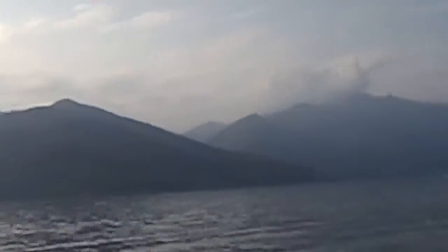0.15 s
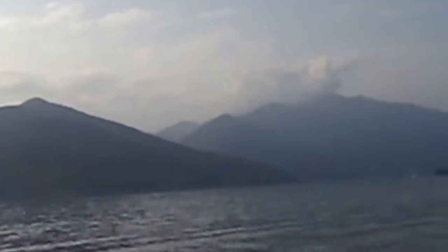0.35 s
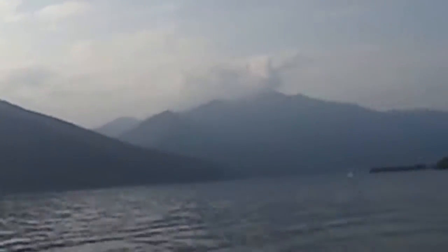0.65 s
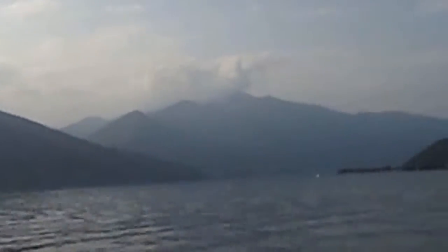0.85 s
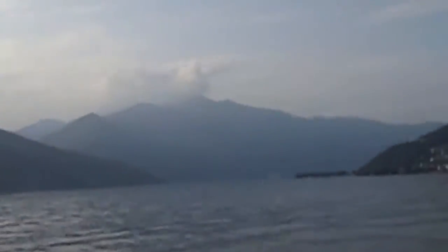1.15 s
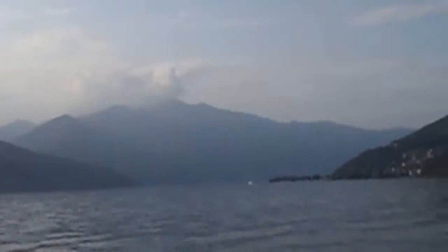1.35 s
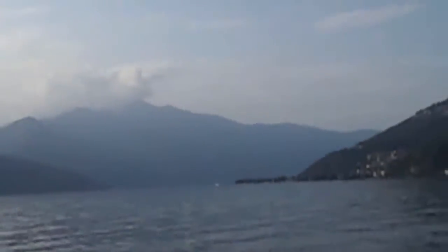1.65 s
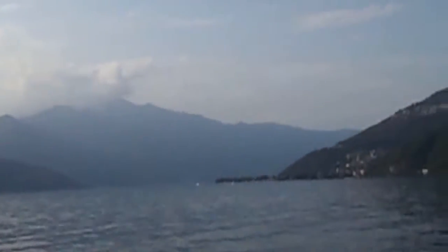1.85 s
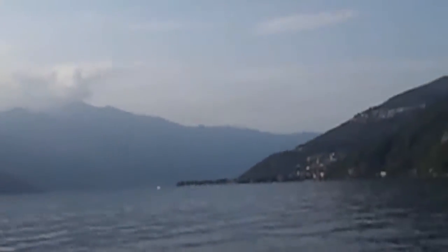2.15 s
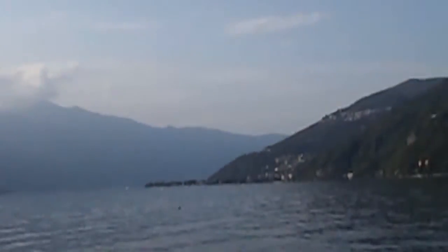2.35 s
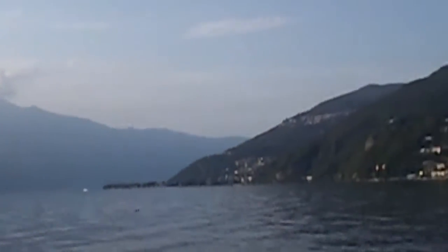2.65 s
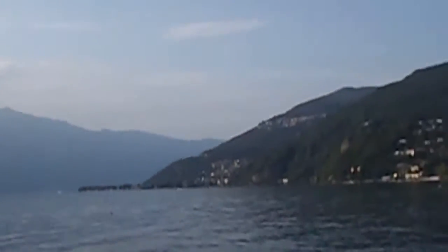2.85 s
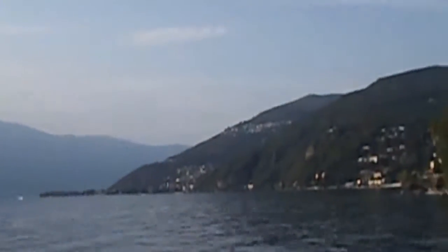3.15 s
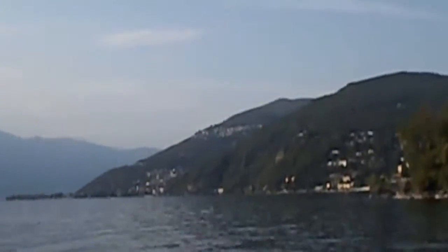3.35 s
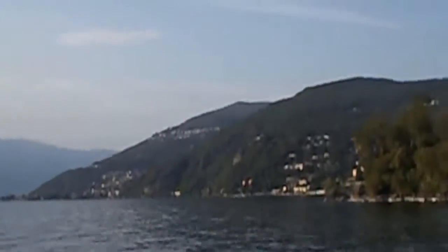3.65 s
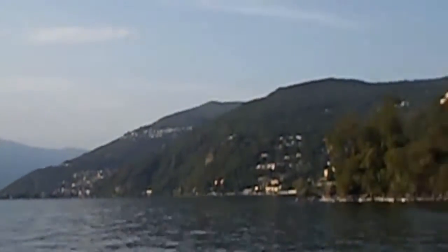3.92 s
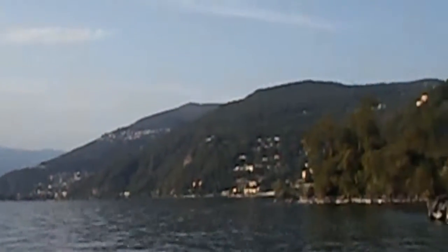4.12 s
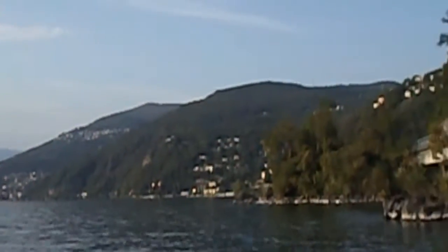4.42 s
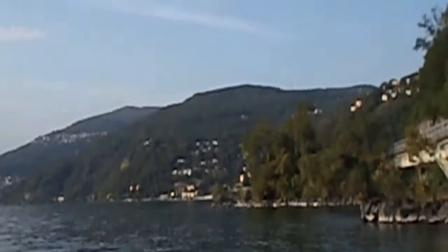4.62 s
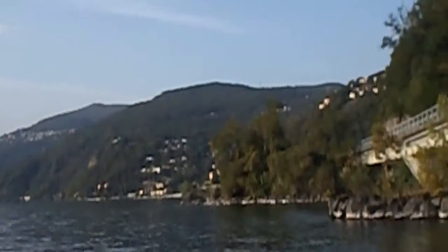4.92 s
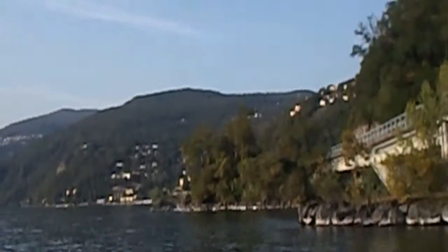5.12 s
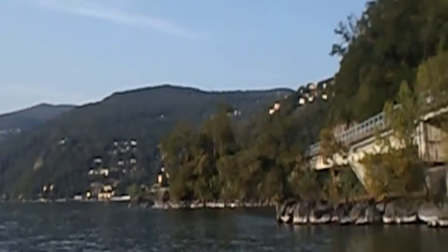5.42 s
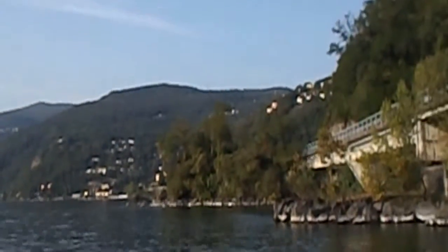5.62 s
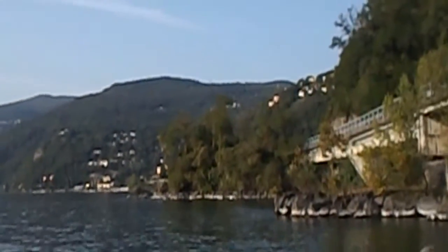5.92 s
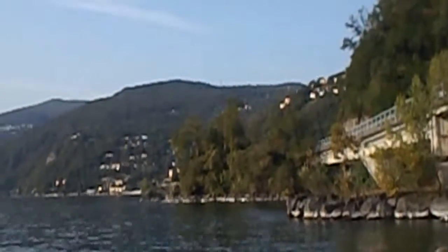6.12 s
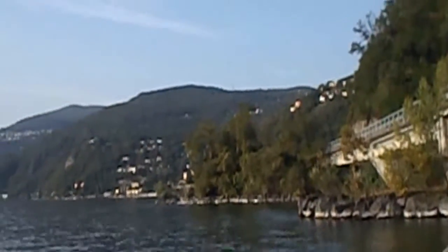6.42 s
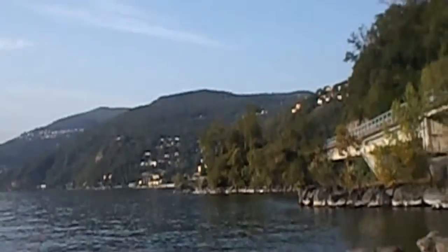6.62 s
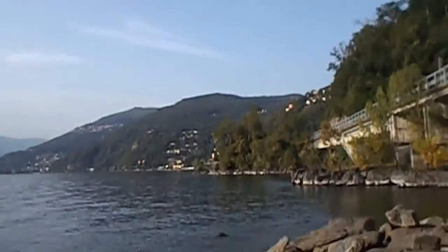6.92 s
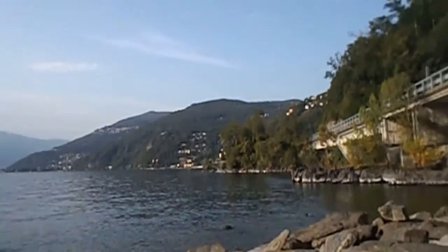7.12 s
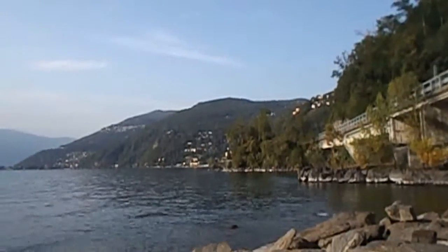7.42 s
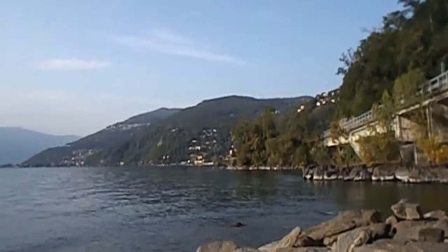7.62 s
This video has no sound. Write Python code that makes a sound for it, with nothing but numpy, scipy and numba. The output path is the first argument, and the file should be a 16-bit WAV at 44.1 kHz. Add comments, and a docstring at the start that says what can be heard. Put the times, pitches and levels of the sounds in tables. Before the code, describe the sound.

Irregular wavelets slap stones and drain through pebbles with gurgles, glugs and fine dry trickling. Early on, a soft low breeze dies away while a far whoosh and brief low drone swell behind. Hard little ticks dot the water, busiest around five seconds. Later, camera plastic creaks raspingly and clicks sharply. Close, open-air sound through a narrow-band, muffled microphone.

```python
"""Small waves lap on a stony lake shore: trapped air gurgles, water splashes and spray fizzes.
The water is swarms of ringing bubbles over filtered noise; single bubbles, strings of them and ticks stand out.
Far traffic hums, a distant whoosh of moving noise bands rises and fades, and a low drone swells twice.
A soft breeze dies away and a hollow among the rocks sounds faintly. Near the end a hand-held camera's
casing creaks and snaps, once with a loud click: short pushes make its plastic shell ring."""
import sys
import numpy as np
from scipy import signal
from scipy.fft import rfft, irfft, next_fast_len
from scipy.io import wavfile
from scipy.ndimage import map_coordinates
from numba import njit

SR = 44100
rng = np.random.default_rng(int(sys.argv[2]) if len(sys.argv) > 2 else 0)


def file_out(sig):
    """Save sig as 16-bit WAV at sys.argv[1]."""
    # one column per channel
    cols = np.atleast_2d(sig).T
    # limit, then scale
    lim = np.clip(cols, -1, 1)
    pcm = np.round(lim * 32767).astype(np.int16)
    wavfile.write(sys.argv[1], SR, pcm)


N = 342650
TIME = np.arange(N) / SR


def undb(db):
    """Turn decibels into a gain."""
    return 10 ** (np.asarray(db) / 20)


def unit(x):
    """Scale a sound to an average (rms) strength of 1."""
    return x / np.sqrt(np.mean(x ** 2))


def noise():
    """Plain white noise for the whole scene."""
    return rng.standard_normal(N)


def colour(x, points):
    """Filter a sound by a curve of (Hz, dB) points, joined by lines over log frequency."""
    hz, db = np.transpose(points)
    size = next_fast_len(N + 8192)
    bins = np.maximum(np.arange(size // 2 + 1) * SR / size, 1)
    gain = undb(np.interp(np.log(bins), np.log(hz), db))
    return irfft(rfft(x, size) * gain, size)[:N]


def cut(x, hz, kind, order):
    """Remove what lies above ("low") or below ("high") a frequency."""
    return signal.sosfilt(signal.cheby1(order, 1, hz, kind, fs=SR, output="sos"), x)


def walk(rate):
    """A smooth random curve of rms 1 that changes about rate times a second."""
    steps = rng.standard_normal(16384)
    return unit(map_coordinates(steps, [TIME * rate], order=2, mode="wrap"))


def swell(peak_s, rise_s, fall_s):
    """A bell-shaped curve, 1 at its peak, with its own rise and fall."""
    return np.exp(-((TIME - peak_s) / np.where(TIME < peak_s, rise_s, fall_s)) ** 2)


def narrow_noise(hz, width_hz):
    """Noise in a narrow band around a centre that may move."""
    phase = 2 * np.pi * np.cumsum(hz * np.ones(N)) / SR
    return unit(walk(width_hz) * np.cos(phase) + walk(width_hz) * np.sin(phase))


def impulses(times, sizes):
    """Single one-sample pushes at given times."""
    places = np.round(np.asarray(times) * SR).astype(int)
    return np.bincount(np.clip(places, 0, N - 1), sizes, N)


@njit
def rings(times, hz, size, cycles, glide):
    """Sines that die by 60 dB within their cycles while the pitch rises by the share glide."""
    out = np.zeros(N)
    for k in range(len(times)):
        start = int(times[k] * SR)
        length = int(cycles[k] * SR / hz[k]) + 2
        phase = 0.
        for i in range(max(0, -start), min(length, N - start)):
            age = i / length
            phase += 2 * np.pi * hz[k] * (1 + glide * age) / SR
            onset = 1 - np.exp(-phase / 2)
            out[start + i] += size[k] * np.exp(-6.9 * age) * onset * np.sin(phase)
    return out


def scatter(x, t60, wet_db):
    """Add a short diffuse tail, as from nearby uneven surfaces; it dies by 60 dB in t60 seconds."""
    t = np.arange(SR // 4) / SR
    tail = rng.standard_normal(len(t)) * undb(-60 * t / t60) * (t > .001)
    return x + undb(wet_db) * signal.fftconvolve(x, tail / np.linalg.norm(tail))[:N]


# Small waves running up the stones. Each row: crest in seconds, rise and drain times in seconds,
# power the wave adds at its crest to wash and to gurgle, in dB against calm water.
WAVES = [(0.102, 0.12, 0.31, 11, 11), (.41, 0.096, 0.13, 12, -4), (.72, 0.3, 0.27, 4.5, 7.5),
         (1.03, 0.19, 0.84, 5.5, -6), (2.248, 0.56, 0.79, 1.5, 4.5), (2.94, 0.58, 1, 6, -9),
         (3.48, 0.17, 0.49, 8, -1), (3.95, 0.056, 0.32, 5.5, -22), (4.482, 0.21, 0.99, 4, 0.5),
         (4.95, 0.19, 1, 6.5, -2.5), (5.33, 0.095, 0.26, 10, 3), (5.58, 0.04, 0.37, 5.5, 2.5),
         (5.75, 0.18, 0.26, 12.5, -15), (7.2, 0.1, 0.15, -8, -3), (7.45, 0.095, 0.13, 9, 2.5),
         (7.76, 0.21, .3, 11.5, -18)]


def surge(strengths_db, drain_stretch):
    """Level over calm water in dB: each wave builds to its crest and drains away, and their powers add."""
    power = 1
    for (crest, rise, drain, *_), db in zip(WAVES, strengths_db):
        age = TIME - crest
        fade = np.where(age < 0, (age / rise) ** 2, age / (drain * drain_stretch))
        power = power + (undb(db) * np.exp(-fade)) ** 2
    return 10 * np.log10(power)


# Wavelets that slap the rocks and throw up bubbles.
# Each row: peak in seconds, half length in seconds, rise in dB (each part of the water scales this).
SLAPS = [(0.242, 0.067, 2.5), (3.628, 0.0074, 1), (4.497, 0.0097, 3.5), (5.287, 0.022, 4),
         (5.325, 0.0051, 2.5), (5.47, 0.027, 1.5), (5.603, 0.012, 3.5), (5.844, 0.0067, 2),
         (5.91, 0.0031, 5.5), (6.136, 0.013, 5.5), (7.18, 0.013, 3)]


def slaps():
    """Brief rises in dB as wavelets hit the rocks."""
    return sum(db * swell(s, half, half) for s, half, db in SLAPS)


def froth(spectrum, low_hz, high_hz, cycles, spread_db, rush_db, flutter_db, count):
    """A swarm of bubbles of all sizes over the smooth rush of the water, in uneven spurts."""
    when, pitch, strength, life = rng.random((count, 4)).T
    hz = low_hz * (high_hz / low_hz) ** pitch
    size = undb(-spread_db * np.log(1 - .965 * strength))
    swarm = rings(when * N / SR, hz, size * hz / low_hz, cycles * (.5 + life), .13)
    rush = unit(colour(noise(), spectrum))
    water = unit(colour(swarm, spectrum)) + undb(rush_db) * rush
    return unit(water * undb(flutter_db * walk(28)))


# Colour of the gurgle. Each row: frequency in Hz, level in dB.
GURGLE = [(90, -46), (170, 8), (250, 0), (340, 1), (450, -2.5), (650, 1), (850, 2), (1150, -4),
          (1800, -2.5), (3500, -37)]
GURGLE_DB = -54  # in calm water


def gurgle(air_db, slap_db):
    """Big, low bubbles of air trapped between the rocks."""
    water = froth(GURGLE, 220, 1200, cycles=23, spread_db=2.7, rush_db=-.5, flutter_db=.7, count=2000)
    return water * undb(GURGLE_DB + air_db + 1.25 * slap_db)


# Colour of the splash. Each row: frequency in Hz, level in dB.
SPLASH = [(450, -10.5), (800, 0), (1100, -0.5), (1450, 0.5), (1900, -1.5), (2500, -3), (3300, -9),
          (5000, -23), (9000, -49)]
SPLASH_DB = -53.5  # in calm water
SPLASH_GROWTH = 0.62  # dB of splash per dB of wash


def splash(wash_db, slap_db):
    """Middling bubbles thrown up by the moving water."""
    water = froth(SPLASH, 800, 3200, cycles=26, spread_db=3.7, rush_db=-.5, flutter_db=1, count=5200)
    return water * undb(SPLASH_DB + SPLASH_GROWTH * wash_db + slap_db)


# Colour of the spray. Each row: frequency in Hz, level in dB.
SPRAY = [(1400, -2), (2400, -5), (3300, 3.5), (4200, 2), (5200, -2.5), (6500, -8), (11500, -8)]
SPRAY_DB = -59.5  # in calm water


def spray(wash_db, slap_db):
    """The finest, highest bubbles fizz among the pebbles."""
    water = froth(SPRAY, 2600, 11000, cycles=28, spread_db=4.4, rush_db=0, flutter_db=1.3, count=7500)
    return water * undb(SPRAY_DB + wash_db + 2.1 * slap_db)


# Colour of water draining through the pebbles. Each row: frequency in Hz, level in dB.
TRICKLE = [(900, -36), (2000, -3), (3500, 4), (6000, -1), (11500, -5.5)]
TRICKLE_DB = -65  # in calm water


def trickle(wash_db, count):
    """Tiny films and droplets burst between the pebbles, each a dry click."""
    when, strength = rng.random((count, 2)).T
    clicks = impulses(when * N / SR, undb(-4.6 * np.log(1 - .985 * strength)))
    drops = unit(colour(scatter(clicks, t60=.008, wet_db=-3), TRICKLE))
    return drops * undb(TRICKLE_DB + wash_db)


def waves():
    """Each wave stirs gurgle, splash, spray and trickle; slaps lift all but the trickle."""
    wash_db = surge([wave[3] for wave in WAVES], drain_stretch=0.94)
    air_db = surge([wave[4] for wave in WAVES], drain_stretch=1.9)  # trapped air drains more slowly
    slap_db = slaps()
    water = gurgle(air_db, slap_db) + splash(wash_db, slap_db) + spray(wash_db, slap_db)
    return water + trickle(wash_db, count=2200)


# Colour of far traffic over the lake. Each row: frequency in Hz, level in dB.
HUM = [(20, -39), (32, -11), (45, -11), (70, -1), (135, 0.5), (190, -5), (280, -9.5), (500, -12.5),
       (1500, -38)]


def hum():
    """Far traffic: steady noise, mostly low."""
    return undb(-52.5) * unit(colour(noise(), HUM))


# The whoosh: its centre climbs in one smooth step while its level swells and fades.
WHOOSH_LOW_HZ, WHOOSH_HIGH_HZ, CLIMB_MIDDLE_S, CLIMB_S = 868, 1392, 1.52, .56
WHOOSH_DB, WHOOSH_PEAK_S, WHOOSH_RISE_S, WHOOSH_FADE_S = -46, 0.94, 1.35, 1.66
CORE_HZ, SKIRT_HZ, SKIRT_DB = 135.1, 558, 1  # widths of narrow core and broad skirt; skirt level
FLARE_S, FLARE_SPAN_S, FLARE_DB = 1.48, 0.054, 4  # the core swells briefly once
CORE_LOSS_DB = 4  # the core melts into the skirt as the whoosh climbs


def whoosh():
    """Two noise bands climb together; the narrow core wavers more and more on its way over the water."""
    climb = .5 + .5 * np.tanh((TIME - CLIMB_MIDDLE_S) / CLIMB_S)
    hz = WHOOSH_LOW_HZ + (WHOOSH_HIGH_HZ - WHOOSH_LOW_HZ) * climb
    flare_db = FLARE_DB * swell(FLARE_S, FLARE_SPAN_S, FLARE_SPAN_S)
    core_db = 1.5 * walk(9) * climb + flare_db - CORE_LOSS_DB * climb
    core = undb(core_db) * narrow_noise(hz, CORE_HZ)
    skirt = undb(SKIRT_DB) * narrow_noise(hz, SKIRT_HZ)
    return unit(core + skirt) * undb(WHOOSH_DB) * swell(WHOOSH_PEAK_S, WHOOSH_RISE_S, WHOOSH_FADE_S)


# Colour of the rumble under the whoosh. Each row: frequency in Hz, level in dB.
RUMBLE = [(70, -16), (130, -4), (190, 3), (280, -4.5), (400, -17.5), (800, -64)]
RUMBLE_DB, RUMBLE_FADE_S = -56.5, 2


def rumble():
    """Low noise that comes and goes with the whoosh, fading a little later."""
    low = unit(colour(noise(), RUMBLE))
    return low * undb(RUMBLE_DB) * swell(WHOOSH_PEAK_S, WHOOSH_RISE_S, RUMBLE_FADE_S)


# Swells of a low far drone. Each row: peak in seconds, half length in seconds, level in dB.
DRONE_SWELLS = [(1.003, 0.45, -59), (1.98, 0.26, -51.5)]


def drone():
    """A low sine that wavers in pitch and strength."""
    hz = 139 + 4 * walk(14)
    gain = sum(undb(db) * swell(s, half, half) for s, half, db in DRONE_SWELLS)
    return np.sin(2 * np.pi * np.cumsum(hz) / SR) * gain * undb(2 * walk(11.3))


BREEZE_DB, BREEZE_FALL_DB_PER_S = -56, 6.5  # level at the start, then its steady fall


def breeze():
    """Soft low buffeting that dies away."""
    buffets = unit(colour(noise(), [(15, -22), (28, -39), (45, 0), (70, -1), (200, -63)]))
    return buffets * undb(BREEZE_DB - BREEZE_FALL_DB_PER_S * TIME)


# Single bubbles that stand out, low and high, and two tonal ticks that ring longer (3.624 s, 4.0407 s). # Each
# row: start in seconds, starting pitch in Hz, level in dB before a shared boost, # length in cycles of the
# starting pitch.
BUBBLES = [(0.089, 483, -32, 14), (0.222, 250, -37, 25), (0.533, 1410, -34, 64), (1.005, 2030, -34, 18),
           (2.089, 537, -38.5, 48), (2.46, 1200, -32, 11), (2.642, 1600, -38, 24), (2.996, 1260, -38.5, 73),
           (3.098, 1640, -38, 32), (3.361, 472, -46, 62), (3.438, 2190, -38, 74), (3.558, 1350, -38, 28),
           (3.624, 4150, -32, 45), (3.664, 1010, -36, 13), (3.728, 583, -40.5, 56),
           (4.0407, 4100, -37.5, 42), (4.379, 3150, -34, 33), (4.4905, 1830, -26.5, 14),
           (4.934, 2350, -27.5, 15), (5.121, 700, -35.5, 24), (5.252, 2030, -30, 15), (5.286, 385, -31, 15),
           (5.292, 1270, -31, 18), (5.293, 233, -35, 13), (5.297, 3120, -29.5, 31), (5.307, 1980, -32, 32),
           (5.321, 324, -27, 8.3), (5.323, 1720, -30.5, 28), (5.471, 885, -34, 32), (5.498, 440, -34, 18),
           (5.507, 300, -32.5, 11), (5.541, 497, -39, 20), (5.589, 1340, -28, 22), (5.5905, 2350, -27, 28),
           (5.592, 1950, -30, 39), (5.725, 2630, -32, 32), (5.775, 318, -40.5, 56),
           (5.839, 1380, -28.5, 23), (5.840, 715, -28, 20), (5.885, 1270, -29.5, 15),
           (5.921, 1260, -28.5, 9), (5.978, 3380, -36, 34), (6.051, 2350, -33.5, 14), (6.189, 683, -32, 22),
           (6.2447, 1590, -25.5, 25), (6.2452, 1980, -29, 48), (6.338, 2020, -34.5, 22),
           (6.9071, 776, -29.5, 19), (7.187, 2070, -38, 16), (7.49, 2470, -35.5, 36), (7.66, 1800, -38, 40)]


def plops():
    """Single bubbles, and a few long-ringing ticks, ring and rise a little in pitch as they fade."""
    s, hz, db, cycles = np.array(BUBBLES, float).T.copy()
    bubbles = rings(s, hz, undb(db + 2.5), cycles, .1)
    return scatter(bubbles, t60=.06, wet_db=-10)


# Air escaping between the stones in quick strings of bubbles.
# Each row: start in seconds, length in seconds, middle pitch in Hz, middle level in dB.
GLUGS = [(0.107, 0.25, 257, -39.5), (5.263, 0.066, 1750, -36), (5.27, 0.068, 395, -36),
         (5.28, 0.063, 3900, -31.5), (5.43, 0.08, 870, -39), (5.434, 0.069, 290, -41),
         (5.442, 0.058, 493, -43), (5.499, 0.086, 1180, -34), (5.648, 0.061, 760, -34),
         (5.769, 0.046, 980, -37), (5.836, 0.017, 970, -31)]
GLUG_SCATTER, GLUG_CYCLES = 0.28, 18.4  # pitch spread as a share; cycles until a bubble is silent


def glugs(count):
    """Each pocket of air breaks into a few bubbles of like size, unevenly spaced."""
    out = 0
    cycles = np.full(count, float(GLUG_CYCLES))
    for s, length, hz, db in GLUGS:
        late, pitch, strong = rng.uniform(-1.037, 1, (3, count))
        times = s + length * (np.arange(count) + .5 + .5 * late) / count
        pitches = hz * (1 + GLUG_SCATTER * pitch)
        out = out + rings(times, pitches, undb(db + 3.4 * strong), cycles, 0.05)
    return scatter(out, t60=.06, wet_db=-10)


# Drops and pebbles ticking on the rocks. Each row: start in seconds, starting pitch in Hz, level in dB
# (the ring gets a shared boost on top), dull knock and fine crack in dB against that level.
TICKS = [(0.3953, 3720, -26, -4, 2), (0.5305, 3300, -28, -2, 0), (0.5367, 3540, -23.5, -4, 5),
         (0.535, 5630, -25.5, -14, 4), (1.5414, 4460, -18, -16, 7.5), (2.229, 2770, -30, -11, -12),
         (2.3536, 3150, -18.5, -7, 0), (2.522, 4950, -32.5, -18, 8), (2.7056, 4600, -30.5, -14, 0),
         (2.9267, 2520, -31, -8, -3), (3.526, 4550, -30, -5, 0), (3.629, 4220, -28, -14, 2),
         (3.667, 3900, -30, -12, -3), (3.7227, 4370, -30, -12, 0), (3.8745, 4070, -31, -12, 0),
         (4.0002, 4400, -22.5, -5, -2), (4.2190, 4100, -16, -3, -14), (4.229, 4600, -28, -12, 3),
         (4.4114, 4860, -25, 4, -4), (4.7803, 3590, -30, -12, -2), (4.8353, 3200, -27, -14, -2),
         (4.874, 8450, -20, -6, 0), (4.8943, 4860, -19, 1, 2), (4.8993, 4750, -13, -8, 4),
         (5.043, 5560, -28.5, -12, 7), (5.713, 5700, -29, -10, 2), (5.89, 4140, -23, -4, 3),
         (6.116, 5200, -30, -6, 6), (6.2448, 3880, -26, -9, 4), (6.263, 4180, -28, -14, 2),
         (6.4512, 9800, -20, -24, -2), (6.484, 4600, -28, -14, 3), (6.501, 4950, -29, -10, 5),
         (6.907, 3730, -23, -14, 1), (6.9187, 4640, -19, -7, 5), (7.1632, 2700, -29.5, -10, -1),
         (7.4143, 6200, -31, -4, 4), (7.7102, 3430, -25.5, 1, 4)]


def ticks():
    """Each contact rings for a few cycles above a duller knock, with a fine crack on top."""
    s, hz, db, knock_db, crack_db = np.array(TICKS, float).T.copy()
    ring = rings(s, hz, undb(db + 2), np.full(len(s), 10.5), .05)
    knock = rings(s, hz * 0.54, undb(db + knock_db), np.full(len(s), 4.), 0.)
    crack = cut(impulses(s, undb(db + crack_db)), 9600, "high", order=2)
    return scatter(ring + knock + crack, t60=.025, wet_db=-9)


HOLLOW_HZ, HOLLOW_WIDTH_HZ, HOLLOW_DB = 665, 130, -58.5  # middle note, width and level at its peak
HOLLOW_PEAK_S, HOLLOW_SPAN_S = 5.43, 2.7


def hollow():
    """A gap between the rocks sounds as a narrow band of noise; its note wanders slowly and at random."""
    note = narrow_noise(HOLLOW_HZ * (1 + 0.028 * walk(3)), HOLLOW_WIDTH_HZ)
    return note * undb(HOLLOW_DB) * swell(HOLLOW_PEAK_S, HOLLOW_SPAN_S, HOLLOW_SPAN_S)


SLIP_JITTER_S, SLIP_SCATTER_DB = .00011, 1.1  # random spread of each slip
BITE_DB = 7.5  # the bite's gain each time the wait between slips doubles


def slips(creak):
    """Stick-slip: one push each time strain has built up again, and its bite, harder after a long wait."""
    seconds, rates, forces = np.transpose(creak)
    rate, force_db = np.interp(TIME, seconds, rates), np.interp(TIME, seconds, forces)
    sliding = (TIME >= seconds[0]) & (TIME < seconds[-1])
    strain = np.cumsum(rate * sliding) / SR
    at = np.flatnonzero(np.diff(np.ceil(strain)))  # a slip at each whole step of strain
    late, strong = rng.standard_normal((64, 2))[:len(at)].T
    times = TIME[at] + SLIP_JITTER_S * late
    db = force_db[at] + SLIP_SCATTER_DB * strong
    bite_db = BITE_DB * np.log2(300 / rate[at])
    return np.array([impulses(times, undb(db)), impulses(times, undb(db + bite_db))])


def scrape(pushes):
    """Every slip trails a brief scrape of many tiny contacts."""
    trail = signal.fftconvolve(pushes, np.exp(-TIME[:SR // 20] / .0009))[:N]
    return pushes + undb(-21) * trail * noise()


REBOUND_S = .00146  # time between rebounds
CATCH_S, CATCH_DB = 0.00078, -9.5  # a light touch this long before each snap; level against the snap


def chatter(s, db, loss_db, count):
    """A light catch, the snap and its quick rebounds, which die ever faster."""
    k = np.arange(count)
    catch = impulses([s - CATCH_S], [undb(db + CATCH_DB)])
    return catch + impulses(s + k * REBOUND_S, undb(db - loss_db * k ** 2))


def ring_of(pushes, table, ratio):
    """Ring a body with pushes: each of its tones dies on its own, all pitches multiplied by ratio."""
    t = np.arange(SR // 10) / SR
    ring = sum(undb(db - 60 * t / t60) * np.sin(2 * np.pi * ratio * hz * t) for hz, db, t60 in table)
    return signal.fftconvolve(pushes, ring)[:N]


# The casing slipping under the grip: one list per creak, its values gliding from row to row.
# Each row: time in seconds, slips per second, force in dB. The last row ends the creak.
CREAKS = [
    [(6.4387, 187, -7), (6.4575, 137, -4.5), (6.459, 300, -9), (6.476, 325, -6), (6.484, 375, -14),
     (6.496, 310, -9), (6.505, 220, -10), (6.512, 140, -18)],
    [(6.5228, 280, -3.5), (6.540, 304, -6), (6.556, 370, -0.5)],
]
# Sharp snaps. Each row: time in seconds, force in dB before a shared cut, dB lost at the first rebound,
# pitch ratio (a tight grip stiffens the shell), push on the rasping seam in dB.
SNAPS = [(6.452, -17.5, 4, 0.91, -2), (6.5596, -10, 11, 1.15, 4), (6.562, -22, 14, 0.89, -14),
         (7.3716, 4, 3, 0.97, 0), (7.3868, -24, 14, 0.97, -10)]
# Tones of the shell. Each row: pitch in Hz before the ratio, level in dB, seconds to die by 60 dB.
CASING = [(1350, -9, 0.0066), (1450, -21, 0.043), (1960, 4.5, 0.01), (2040, -21, 0.07), (2346, 2, 0.011),
          (2430, -38, .08), (2820, -19, 0.0067), (2800, -29.5, 0.059), (3280, -14, 0.011),
          (3800, -33, 0.015), (4900, -48, .003), (7500, -8, 0.0018), (9000, -8, 0.0022),
          (11100, -15, 0.0026)]
# Thin ring of the rubbing seam. Each row: pitch in Hz before a shared ratio, level in dB,
# seconds to die by 60 dB.
RASP = [(3400, -6, .004), (3980, -4.5, .005), (4980, -8, 0.0039)]
# Slower flexing of the whole camera in the hand. Each row: pitch in Hz before a shared ratio,
# level in dB, seconds to die by 60 dB.
FLEX = [(288, -1.5, 0.052), (646, 9.5, 0.011), (930, -5, 0.078), (1100, -21, 0.0036)]


def casing():
    """Slips and snaps ring a shell too small to radiate bass and rasp its seam; slips also make it buzz low."""
    pulses, bites = sum(slips(creak) for creak in CREAKS)
    # creaks are dull: a steep low-pass leaves little above 2.8 kHz to drive the shell
    creak = cut(scrape(pulses), 2840, "low", order=8)
    shell = undb(-25.5) * ring_of(creak, CASING, 0.97)
    for s, db, loss_db, ratio, rasp_db in SNAPS:
        shell = shell + ring_of(chatter(s, db - 11.0, loss_db, count=4), CASING, ratio)
        bites = bites + impulses([s], [undb(rasp_db)])
    rasp = cut(ring_of(scrape(bites), RASP, 0.98), 5240, "low", order=8)
    flex = cut(ring_of(pulses, FLEX, 0.99), 190, "high", order=3)
    body = cut(shell + undb(-28) * rasp, 1060, "high", order=3) + undb(-33.0) * flex
    return scatter(body, t60=.04, wet_db=-24)


def scene():
    """Water, far sounds, breeze and handling added up at one microphone."""
    distance = hum() + whoosh() + rumble() + drone()
    shore = waves() + plops() + glugs(count=6) + ticks() + hollow()
    return (shore + distance + breeze() + casing())[None]


# Colour of the recorder: the small microphone loses deep bass, and the recorder's low-pass filter
# leaves the top octave weak and rippled. Each row: frequency in Hz, level in dB.
RECORDER = [(15, -33), (25, -6), (45, -2), (5000, 1), (6200, -1), (6650, -7.5), (7000, -23.5), (7400, -12),
            (8000, -11.5), (8500, -27), (8950, -14.5), (9550, -12.5), (10000, -28), (10450, -9.5),
            (11000, -10), (11800, -16.5)]
BAND_HZ, TOP_HZ = 11300, 15600  # low-pass edges before and after clipping
CEILING = .69  # clipping level (full scale is 1)


def record(dry):
    """A small camera recorder with a dull, narrow band; the loudest peaks are rounded, then clipped."""
    band = signal.ellip(8, .2, 70, BAND_HZ, fs=SR, output="sos")
    top = signal.ellip(8, .2, 70, TOP_HZ, fs=SR, output="sos")
    rounded = .9 * np.tanh(dry[0] / .9)
    narrowed = signal.sosfilt(band, colour(rounded, RECORDER))
    return signal.sosfilt(top, np.clip(narrowed, -CEILING, CEILING))[None]


dry = scene()
out = record(dry)
file_out(out)
```